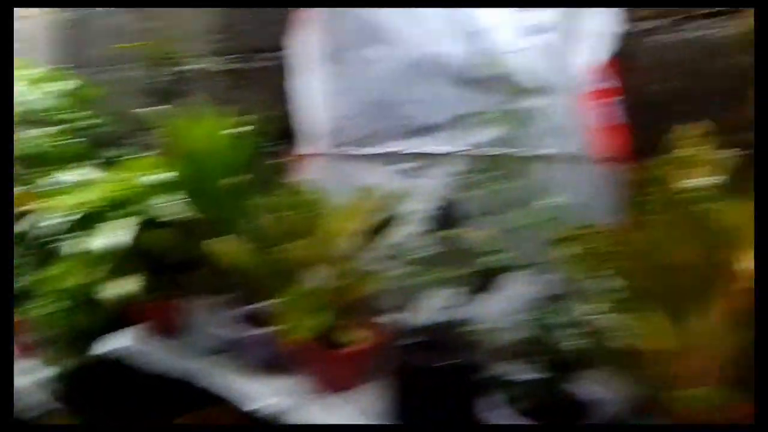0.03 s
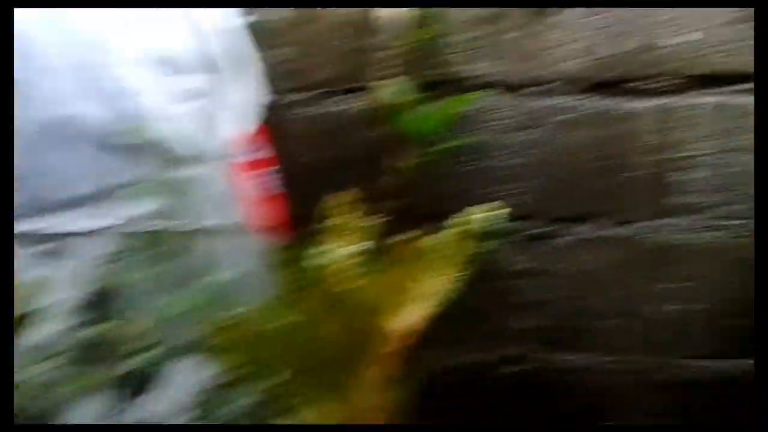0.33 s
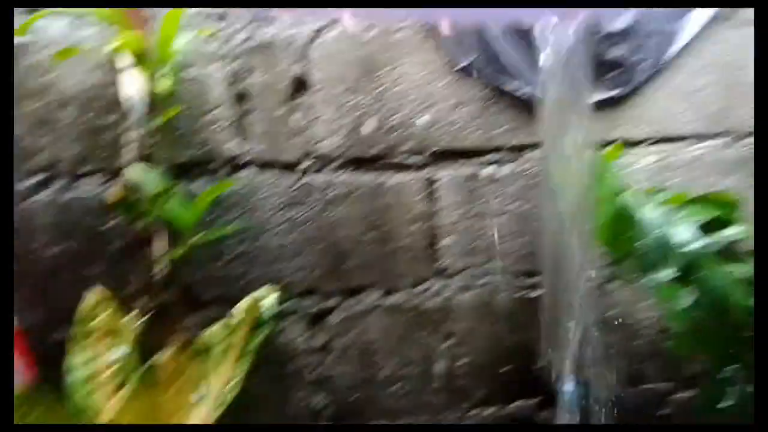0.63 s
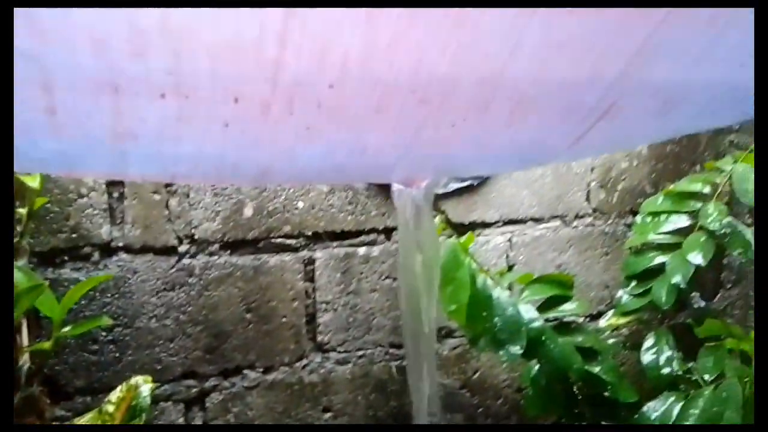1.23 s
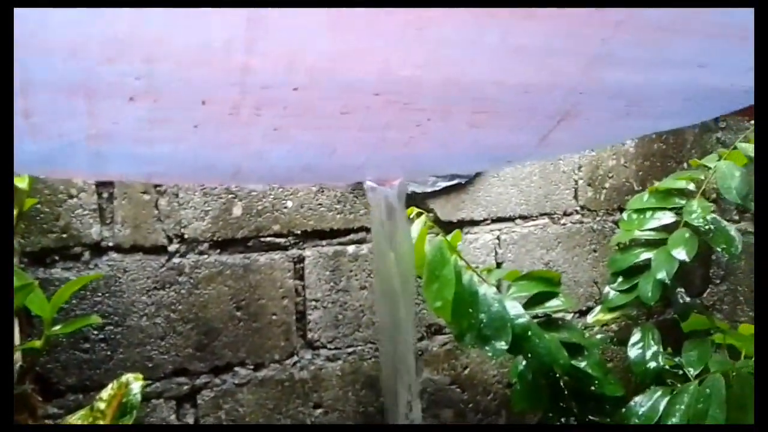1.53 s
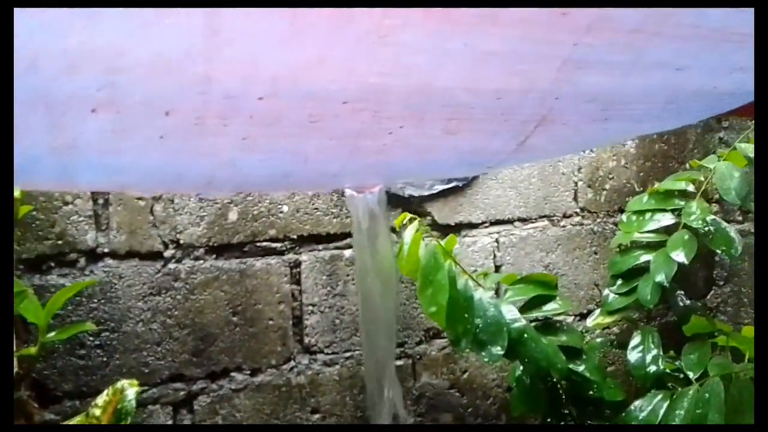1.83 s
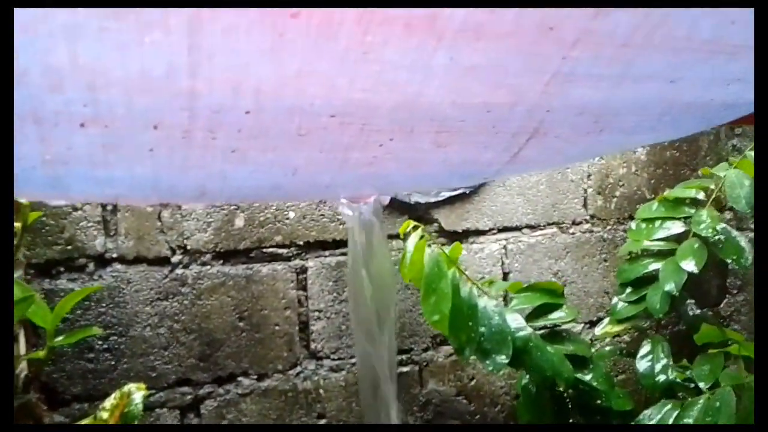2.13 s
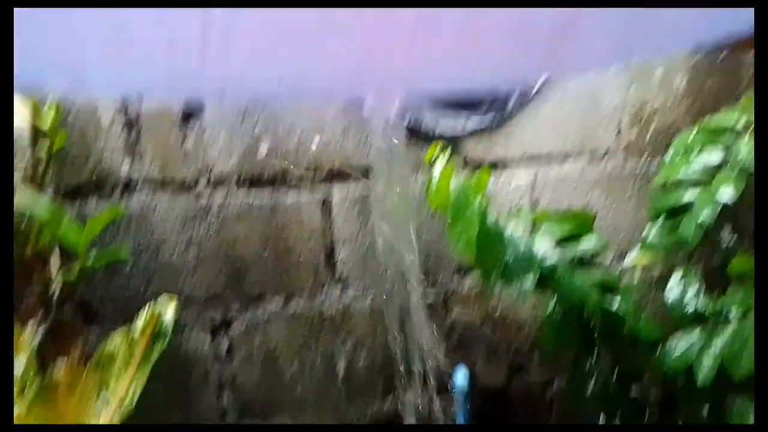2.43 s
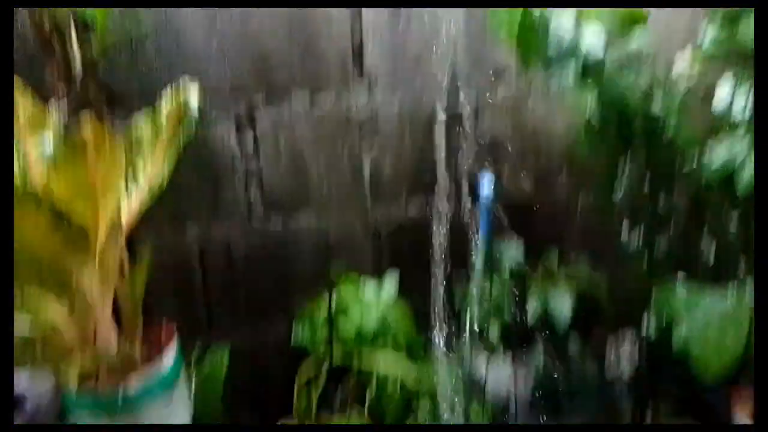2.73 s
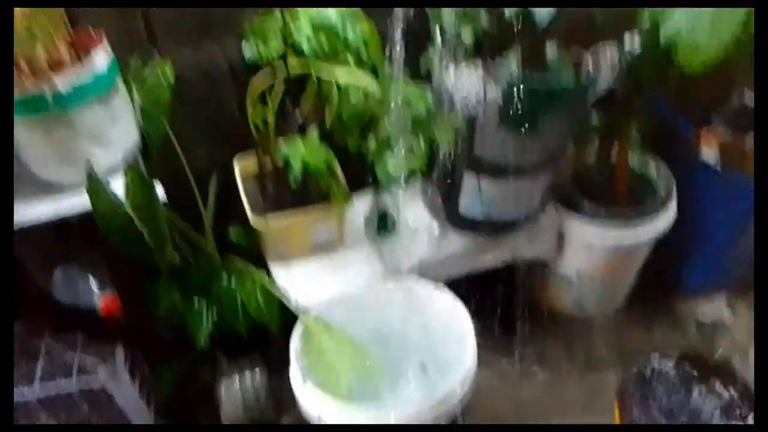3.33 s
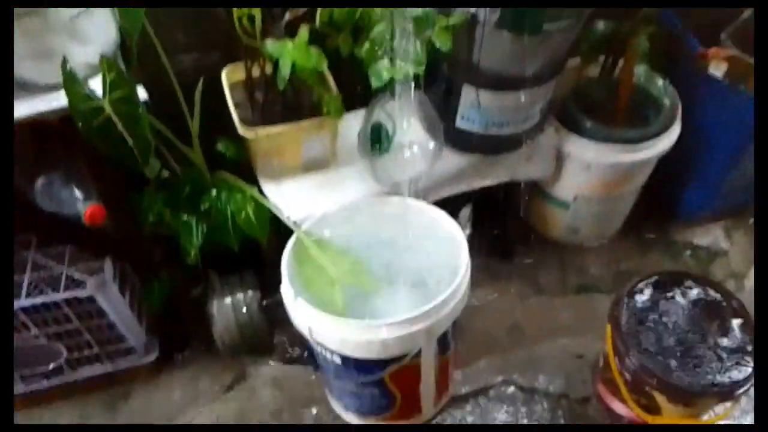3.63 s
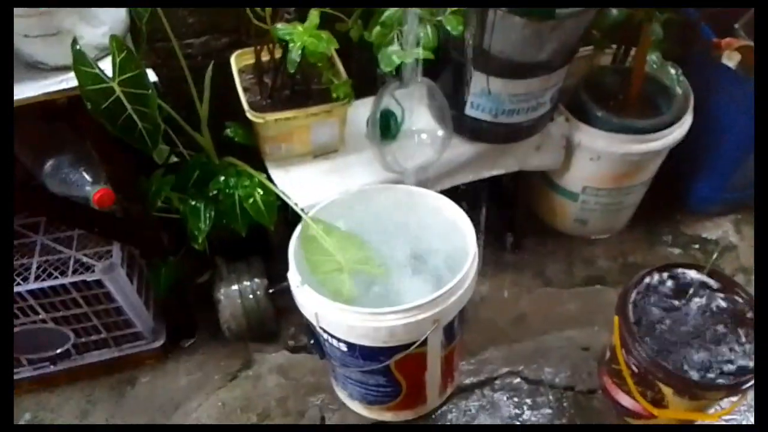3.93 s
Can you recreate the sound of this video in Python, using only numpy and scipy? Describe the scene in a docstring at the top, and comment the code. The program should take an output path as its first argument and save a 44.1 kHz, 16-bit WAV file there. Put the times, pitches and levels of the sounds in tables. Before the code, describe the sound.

A stream of water splashing into a plastic bucket, with steady heavy rain behind it.

```python
"""Heavy rain in a small walled yard, with a stream off an awning splashing into a bucket.
Lumps of falling water patter, throw spray, churn up bubbles and drum on the bucket with a hollow ring.
Fat drops plop, slugs of water slap the wet ground, small drops tick close by and one knocks on plastic;
past the middle, large air pockets bloop. The walls add short reflections to all this near water,
while far rain lays an even wash behind it."""
import sys
import numpy as np
from scipy import signal
from scipy.io import wavfile
from scipy.ndimage import uniform_filter1d, map_coordinates

SR = 44100
rng = np.random.default_rng(int(sys.argv[2]) if len(sys.argv) > 2 else 0)


def file_out(sig):
    """Save sig as 16-bit WAV at sys.argv[1]."""
    # one column per channel
    cols = np.atleast_2d(sig).T
    # limit, then scale
    lim = np.clip(cols, -1, 1)
    pcm = np.round(lim * 32767).astype(np.int16)
    wavfile.write(sys.argv[1], SR, pcm)


N = 176400

# Strength of the splashing stream: time_s, level_db
STREAM_FLOW = [(0, -36), (.47, -37), (.55, -40.5), (.85, -35.5), (1.2, -39.5), (1.42, -37), (1.7, -39),
               (2.09, -38.5), (2.19, -31.5), (2.32, -34), (2.37, -34.5), (2.55, -34), (2.84, -36),
               (2.92, -42.5), (3.28, -38), (3.42, -46), (3.56, -42.5), (3.82, -43), (3.86, -40),
               (3.96, -31.5), (4, -35.5)]
BUBBLE_RISE = 0.037   # depth of a bubble's upward glide, as a share of its pitch


def from_db(db):
    """Decibels to gain."""
    return 10 ** (np.asarray(db) / 20)


def rms_one(x):
    """Scale to unit rms."""
    return x / np.sqrt(np.mean(x ** 2) + 1e-20)


def fader(rows):
    """Gain over time from rows of time_s, level_db."""
    return from_db(np.interp(np.arange(N) / SR, *np.transpose(rows)))


def drift(rate_hz):
    """Smooth random wander with unit rms."""
    step, settle = 40, 2000
    pole = np.exp(-2 * np.pi * rate_hz * step / SR)
    noise = rng.standard_normal(N // step + settle + 2)
    slow = signal.lfilter([1], [1, -2 * pole, pole * pole], noise)[settle:]
    return np.interp(np.arange(N) / step, np.arange(len(slow)), rms_one(slow))


def resonate(x, hz, width_hz):
    """One resonance with unit gain at its peak."""
    r = np.exp(-np.pi * width_hz / SR)
    feedback = [1, -2 * r * np.cos(2 * np.pi * hz / SR), r * r]
    return signal.lfilter(np.array([1, 0, -1]) * (1 - r * r) / 2, feedback, x + 1e-18)


def impacts(per_s, spread_db):
    """Randomly timed clicks of uneven size."""
    sizes = from_db(spread_db * np.minimum(rng.exponential(1, N), 4.5))
    return rms_one(sizes * rng.choice([-1, 1], N) * (rng.random(N) < per_s / SR))


def coloured(spectrum, excite):
    """Third-octave bands, each fed by its own call of excite and weighted by the spectrum."""
    hz, db = np.transpose(spectrum)
    edges, out = 31.25 * 2 ** (np.arange(28) / 3), 0
    for low, high in zip(edges, edges[1:]):
        if high > hz[0] and low < hz[-1]:
            gain = from_db(np.interp(np.log(low * high) / 2, np.log(hz), db))
            band = signal.butter(2, [low, high], "band", fs=SR, output="sos")
            out = out + gain * signal.sosfilt(band, excite() + 1e-18)
    return rms_one(out)


def shower(spectrum, per_s, spread_db, patchy_db):
    """A shower of impacts, each with a colour of its own."""
    clicks = impacts(per_s, spread_db)
    return coloured(spectrum, lambda: clicks * rng.standard_normal(N) * from_db(patchy_db * drift(35)))


def far_rain():
    """Countless distant drops merge into a wash over a low rumble."""
    # Tone of the wash: freq_hz, density_db
    wash_tone = [(50, -24), (75, -34), (105, -2.5), (190, -0.5), (260, -2.5), (400, 2), (700, -7),
                 (1300, 5.5), (2400, -0.5), (4000, -7.5), (6500, -20.5), (8400, -19), (15500, -30)]
    # Fader of the rumble: time_s, level_db
    rumble_levels = [(0, -51), (.4, -62), (.6, -63), (2.4, -68), (3.0, -77), (4, -74)]
    rumble_band_hz = (65.8, 17)   # centre, width
    wash = coloured(wash_tone, lambda: rng.standard_normal(N) * from_db(1.6 * drift(8.5)))
    rumble = rms_one(resonate(resonate(rng.standard_normal(N), *rumble_band_hz), *rumble_band_hz))
    bass_cut = signal.butter(3, 48, "high", fs=SR, output="sos")
    return signal.sosfilt(bass_cut, from_db(-42) * wash + fader(rumble_levels) * rumble)


def lumps(per_s=160, decay_s=0.006):
    """The stream breaks into lumps, each a surge that lands at once and dies away."""
    landings = rng.exponential(1, N) * (rng.random(N) < per_s / SR)
    swell = signal.lfilter([1], [1, -np.exp(-1 / (decay_s * SR))], landings) ** .5
    return rms_one(swell - uniform_filter1d(swell, size=SR // 6))


def stream():
    """Lumps of falling water patter, throw fine spray and churn the bucket into a low gurgle."""
    # Tone of each layer: freq_hz, density_db
    patter_tone = [(500, -24.5), (900, -8.5), (1500, -1), (2000, 0.5), (2600, -1), (3300, -3.5),
                   (5000, -16), (6500, -17), (9000, -33)]
    spray_tone = [(4000, 5.5), (5200, 4), (6800, 0), (8400, 0), (11000, -6.5), (15500, -9.5)]
    gurgle_tone = [(110, -3.5), (180, -0.5), (300, 0), (550, 1.5), (850, 3), (1200, -5)]
    # Faders of the spray and the gurgle: time_s, level_db
    spray_levels = [(0, -44), (.48, -43), (.55, -46), (1.35, -46.5), (2.08, -46), (2.26, -38), (2.38, -42),
                    (2.65, -43), (2.9, -50.5), (3.15, -53.5), (3.82, -53), (3.86, -47.5), (4, -42)]
    gurgle_levels = [(0, -35.5), (.45, -42), (.6, -44), (2.1, -46.5), (2.2, -36), (2.31, -39.5),
                     (2.38, -40.5), (2.85, -42), (2.95, -47), (3.85, -44), (4, -35)]
    surge = lumps()
    patter = fader(STREAM_FLOW) * shower(patter_tone, per_s=2200, spread_db=3, patchy_db=2.5)
    spray = fader(spray_levels) * shower(spray_tone, per_s=6500, spread_db=-0.5, patchy_db=2.5)
    gurgle = fader(gurgle_levels) * shower(gurgle_tone, per_s=1100, spread_db=0.2, patchy_db=1)
    return (from_db(-1.5 + 1.5 * surge) * patter
            + from_db(-0.5 + 2 * surge) * spray
            + from_db(-2.5) * gurgle)


def slosh(x, bend=0.02):
    """Sloshing water bends all pitches up and down together."""
    position = np.cumsum(1 + bend * drift(10))
    return map_coordinates(x, [position], order=3, mode="mirror")


def drumming():
    """Water beats on the bucket and wakes its hollow resonances, which waver as it sloshes."""
    # Resonances of the bucket: pitch_hz, width_hz, gain_db
    bucket_modes = [(1000, 45, -18), (1228, 35, -1.5), (1333, 115, 1.5), (1820, 120, -7.5), (2480, 310, -5)]
    # Fader of the drumming: time_s, level_db
    drum_levels = [(0, -27.5), (.13, -33), (.37, -31), (.48, -31.5), (.53, -37), (1.05, -43), (1.45, -38.5),
                   (2.12, -42.5), (2.19, -29), (2.32, -30), (2.38, -41), (2.6, -38), (2.86, -32),
                   (2.92, -41.5), (3.8, -41), (3.96, -32), (4, -32.5)]
    clicks = impacts(per_s=1400, spread_db=1.6)
    rings = sum(from_db(db) * rms_one(resonate(clicks * rng.standard_normal(N), hz, width_hz))
                for hz, width_hz, db in bucket_modes)
    hollow = rms_one(resonate(slosh(rings), hz=1720, width_hz=1960))
    return from_db(-2) * fader(drum_levels) * hollow


def bubbles(per_s=170, decay_cycles=13):
    """Trapped bubbles ring briefly and rise in pitch as they surface."""
    out, t = np.zeros(N + SR), np.arange(SR // 20) / SR
    for when, pitch, size, life in rng.random((int(per_s * N / SR), 4)):
        hz = 700 * (5500 / 700) ** pitch
        age = t * hz / (decay_cycles * (.5 + life))
        db = 10.4 * size ** 2 - 4.9 * np.log2(hz / 1650) ** 2
        ring = np.sin(2 * np.pi * hz * t * (1 + BUBBLE_RISE * np.tanh(age / 2)))
        start = int(when * N)
        out[start:start + len(t)] += from_db(db) * np.exp(-age) * ring
    return from_db(-43) * rms_one(out[:N] * fader(STREAM_FLOW) ** 0.2)   # loosely rides the flow


def mist():
    """Tiny droplets prickle in the top treble."""
    # Fader of the mist: time_s, level_db
    mist_levels = [(0, -54), (.6, -58), (2.05, -61), (2.28, -50), (2.45, -65), (2.8, -50.5), (3.3, -55),
                   (3.82, -52), (3.88, -49.5)]
    # Tone of the mist: freq_hz, density_db
    mist_tone = [(8000, 6.5), (12000, -2.5), (15800, -1.5)]
    return fader(mist_levels) * shower(mist_tone, per_s=2900, spread_db=1, patchy_db=-2.5)


def splat(start_s, db, hz, decay_s, width, crack_db, bubble_db=-20):
    """A drop cracks, bursts in a dying splash and traps a bubble that rings with rising pitch."""
    t = np.arange(SR // 10) / SR
    decay = np.exp(-t / decay_s)
    noise = rng.standard_normal(len(t))
    splash = rms_one(resonate(resonate(noise, hz, hz * width), hz, 2 * hz * width) * decay)
    crack = rms_one(resonate(resonate(noise, hz, 1.7 * hz), hz, hz) * decay ** 2)
    bubble = rms_one(np.sin(2 * np.pi * hz * t * (1 + BUBBLE_RISE * (.5 - decay))) * decay)
    soften = signal.butter(2, [hz / 1.68, min(1.68 * hz, .45 * SR)], "band", fs=SR, output="sos")
    hit = signal.sosfilt(soften, splash + from_db(crack_db) * crack + from_db(bubble_db) * bubble)
    out, start = np.zeros(N + SR), int(start_s * SR)
    out[start:start + len(t)] = from_db(db) * rms_one(hit) * np.sqrt(np.mean(decay ** 2))
    return out[:N]


def plops():
    """Fat drops land with a round note from the bubble they trap."""
    # Fat drops: start_s, strength_db, pitch_hz
    fat_drops = [(.044, -11.5, 1210), (.25, -16, 955), (.301, -11.5, 1303), (.349, -14, 1300),
                 (.436, -14, 1300), (0.453, -12, 1270), (.462, -6.5, 1283), (1.788, -17, 1770),
                 (1.842, -16.5, 1870), (1.843, -21, 920), (2.183, -21, 880), (2.231, -10.5, 940),
                 (2.236, -14, 2930), (2.246, -15, 960), (2.412, -22, 990), (2.458, -16.5, 2750),
                 (2.602, -14.5, 1990), (2.64, -18.5, 2240), (2.757, -12.5, 1930), (3.588, -17, 1390),
                 (3.735, -22.5, 1115), (3.784, -20.5, 1060), (3.821, -22, 1230), (3.952, -13.5, 1470)]
    return sum(splat(start_s, db - 9.5, hz, decay_s=0.0054, width=0.097, crack_db=-3, bubble_db=2.5)
               for start_s, db, hz in fat_drops)


def slaps(drops_per_s=2500, decay_s=0.0075, width=0.75):
    """Slugs of water hit the wet ground and shatter into dying volleys of hard drops."""
    # Slugs of water: start_s, strength_db, centre_hz
    slugs = [(0.1265, -32, 4500), (0.197, -24, 1300), (0.268, -31, 3220), (0.666, -24.5, 1600),
             (0.931, -29, 1840), (1.0077, -42, 2780), (1.2855, -32, 4460), (1.6015, -34, 5000),
             (1.72, -35, 4750), (1.841, -24, 1700), (1.871, -25, 1900), (1.985, -28, 1780),
             (2.1385, -28.5, 4000), (2.174, -24, 1800), (2.1834, -22.5, 1520), (2.198, -29, 1590),
             (2.213, -27, 2100), (2.248, -25, 2000), (2.262, -26.5, 1890), (2.278, -22, 1680),
             (2.3234, -27, 3400), (2.366, -32, 1790), (2.4444, -28, 2870), (2.6025, -25.5, 3020),
             (2.6546, -34, 4200), (2.699, -27, 1400), (2.757, -23, 1690), (3.536, -29.5, 1780),
             (3.626, -32.5, 2830), (3.95, -23, 2020)]
    out, t = np.zeros(N + SR), np.arange(SR // 10) / SR
    decay = np.exp(-t / decay_s)
    for start_s, db, hz in slugs:
        sizes = rng.choice([-1, 1], len(t)) * rng.uniform(0.39, 1, len(t))
        volley = sizes * (rng.random(len(t)) < drops_per_s / SR)
        volley[0] = 0.91   # the slug's own attack
        hit = resonate(resonate(volley * decay, hz, hz * width), hz, 2 * hz * width)
        start = int(start_s * SR)
        out[start:start + len(t)] += from_db(db - 4) * rms_one(hit) * np.sqrt(np.mean(decay ** 2))
    return out[:N]


def ticks():
    """Small drops burst sharply and cut through the patter."""
    # Small drops: start_s, strength_db, pitch_hz, decay_s
    small_drops = [(.5117, -11.5, 4860, 0.0008), (.6393, -25.5, 3410, .003), (1.5262, -21, 3300, .002),
                   (2.329, -24, 4300, .003), (2.6692, -19.5, 3150, 0.002), (2.985, -25, 4410, .0015),
                   (3.8383, -18, 3200, .003)]
    return sum(splat(start_s, db - 5.5, hz, decay_s, width=0.26, crack_db=-10)
               for start_s, db, hz, decay_s in small_drops)


def droplets():
    """Droplets land very close with a thin, bright spit."""
    # Close droplets: start_s, strength_db, pitch_hz
    close_drops = [(1.053, -30, 12500), (1.2855, -31, 12500), (2.918, -31, 13000), (3.1921, -28, 12400),
                   (3.2947, -25.5, 13200)]
    return sum(splat(start_s, db - 11.5, hz, decay_s=0.0038, width=0.36, crack_db=-5)
               for start_s, db, hz in close_drops)


def knock():
    """A hard drop splashes on plastic and sets it ringing briefly."""
    # The hard drop: start_s, strength_db
    strikes = [(1.0534, -16.7)]
    # Modes of the plastic: pitch_hz, gain_db, t60_s
    plastic_modes = [(976, -10.5, .06), (1380, -9, 0.029), (1835, -2, 0.046), (1945, -7, 0.039),
                     (2430, -9, 0.11), (2740, 3, 0.025), (3140, -15, 0.028)]
    out = 0
    for start_s, db in strikes:
        t = np.maximum(np.arange(N) / SR - start_s, 0)
        for k, (hz, mode_db, t60_s) in enumerate(plastic_modes):
            envelope = from_db(db + mode_db - np.minimum(60 * t / t60_s, 200))
            out = out + (-1) ** k * envelope * np.sin(2 * np.pi * hz * t)
        out = out + splat(start_s, db - 7.5, hz=2300, decay_s=0.013, width=0.34, crack_db=-25)
    return out


def bloops(attack_s=0.00058, decay_s=0.0098):
    """Large pockets of air are dragged under and ring almost purely."""
    # Air pockets: start_s, level_db, pitch_hz
    air_pockets = [(2.305, -30.5, 543), (2.4125, -20.5, 880), (2.424, -22.5, 743)]
    out = 0
    for start_s, db, hz in air_pockets:
        t = np.maximum(np.arange(N) / SR - start_s, 0)
        envelope = (1 - np.exp(-t / attack_s)) * np.exp(-np.minimum(t / decay_s, 20))
        out = out + from_db(db) * envelope * np.sin(2 * np.pi * hz * t)
    return out


def yard(x, t60_s=0.38, predelay_s=0.004):
    """Short scattered reflections from the walls and the awning."""
    t = np.arange(SR // 2) / SR
    tail = rng.standard_normal(len(t)) * from_db(-60 * t / t60_s) * (t > predelay_s)
    tail = signal.sosfilt(signal.butter(1, 7000, fs=SR, output="sos"), tail)
    return signal.fftconvolve(x, tail / np.linalg.norm(tail))[:N]


def scene():
    """Near water with its reflections, in front of the far rain; mono."""
    bed = stream() + drumming() + bubbles() + mist()
    near = bed + plops() + ticks() + droplets() + bloops() + slaps() + knock()
    return (near + from_db(-14.5) * yard(near) + far_rain())[None]


def record(dry):
    """The microphone colours the treble, and the top is cut steeply."""
    # A treble lift and a dip: centre_hz, width_hz, added_gain
    treble_eq = [(8210, 830, 0.4), (9810, 2500, -0.56)]
    for hz, width_hz, gain in treble_eq:
        dry = dry + gain * resonate(dry, hz, width_hz)
    top_cut = signal.ellip(14, .2, 60, 15850, fs=SR, output="sos")
    return signal.sosfilt(top_cut, dry)


dry = scene()
out = record(dry)
file_out(out)
```